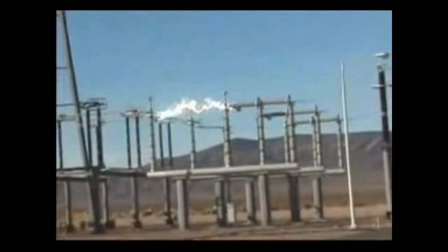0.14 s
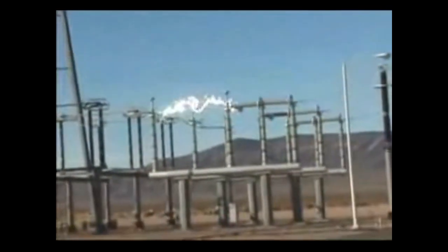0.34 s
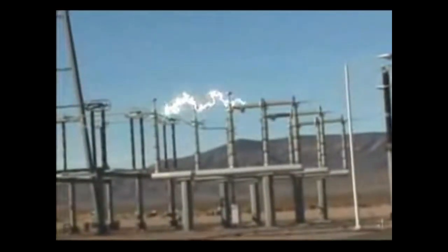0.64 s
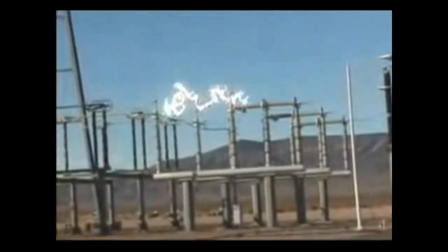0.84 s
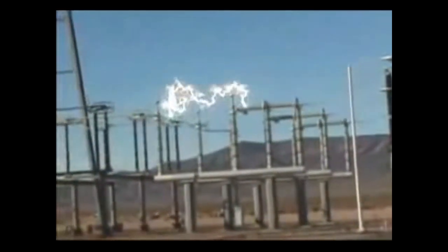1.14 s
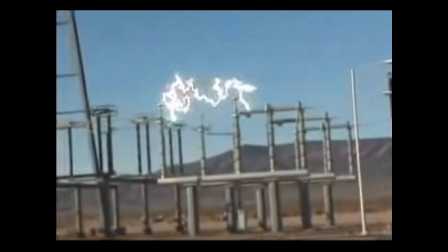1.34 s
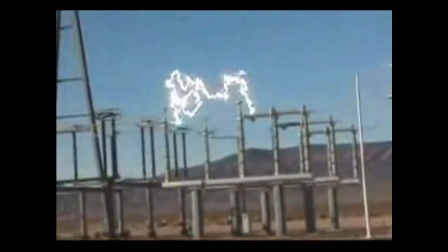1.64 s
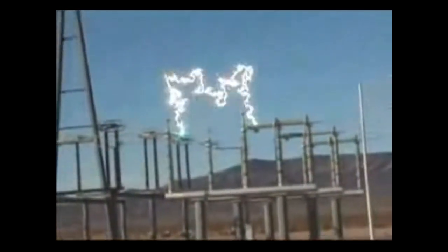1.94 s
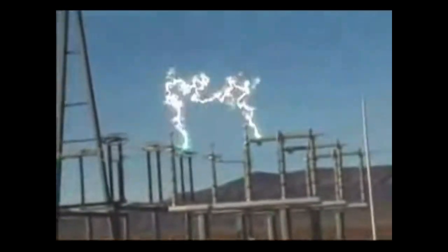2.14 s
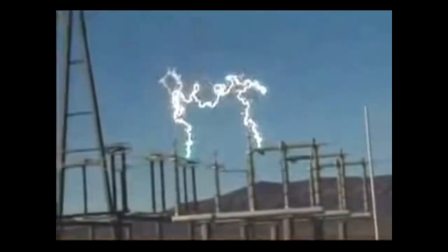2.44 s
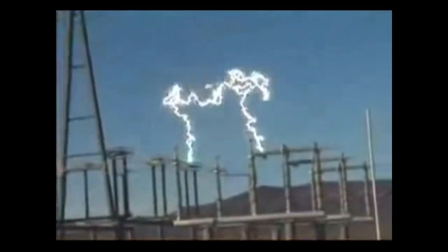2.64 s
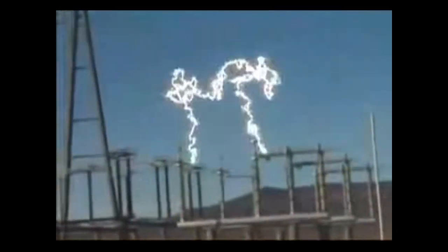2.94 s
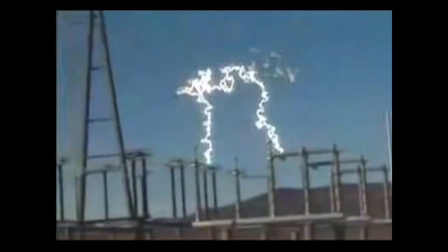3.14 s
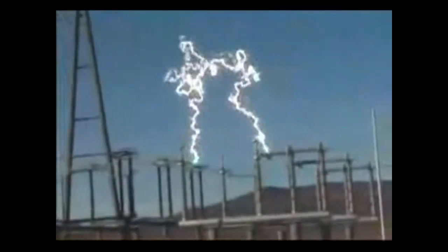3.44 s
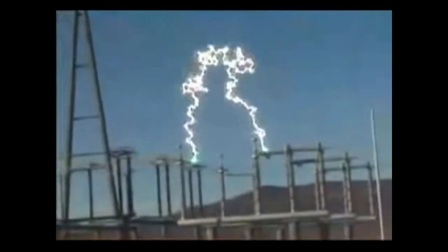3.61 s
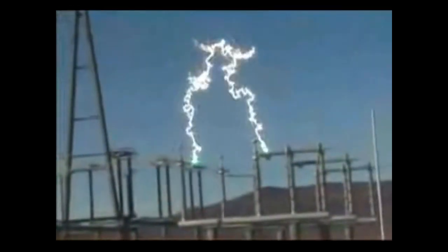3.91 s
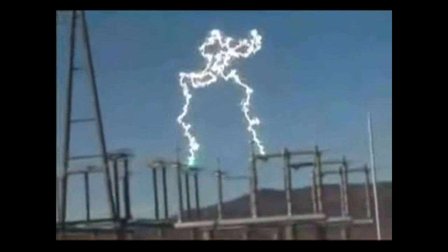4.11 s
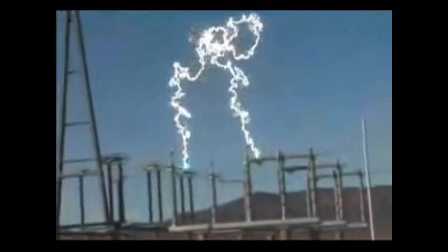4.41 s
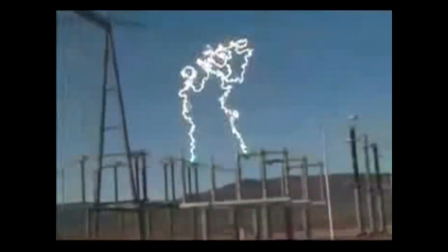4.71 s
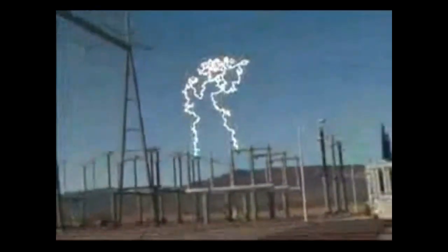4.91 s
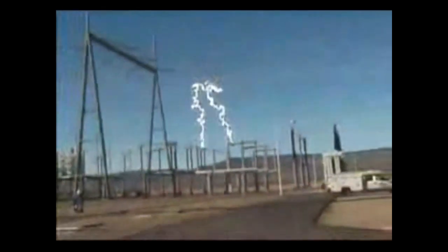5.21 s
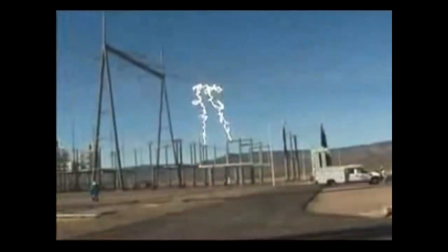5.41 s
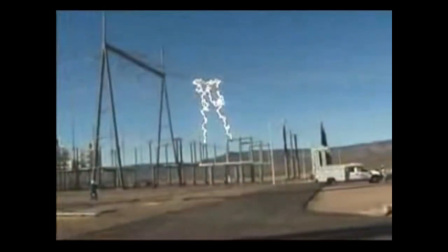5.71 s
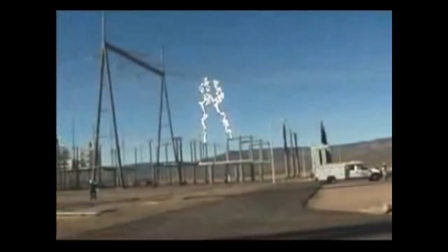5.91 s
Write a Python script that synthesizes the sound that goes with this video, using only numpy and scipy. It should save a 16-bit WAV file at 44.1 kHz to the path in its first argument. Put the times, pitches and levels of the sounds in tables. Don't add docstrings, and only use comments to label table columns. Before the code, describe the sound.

A long high-voltage arc burns over an open switch in an outdoor yard, heard from a distance on a small camera. A deep hum near 120 hertz drones unbroken, wavering in tone, while dense sputtering hiss swells and ragged crackles snap. A hard knock with a deep push lands just past two seconds; the hum weakens at the end while the hiss continues.

```python
import sys
import numpy as np
from scipy import signal
from scipy.fft import rfft, irfft
from scipy.io import wavfile

SR = 44100
rng = np.random.default_rng(int(sys.argv[2]) if len(sys.argv) > 2 else 0)


def makeup_ratio(level_db):
    decades = np.asarray(level_db, float) / 20
    return 10 ** decades


def persist_wave(psi):
    counts = np.round(np.clip(psi, -1, 1) * 32767).astype(np.int16)
    wavfile.write(sys.argv[1], SR, np.atleast_2d(counts).T)


N = 267246
PULSE_HZ = 119.76

# [t/s, level/dB]
HUM_LEVEL = [(0.0, -13.5), (0.47, -14.5), (0.49, -16), (0.7, -16), (0.73, -17), (1.11, -14), (1.24, -15.5),
             (1.41, -16.5), (2.53, -13), (3.69, -13), (3.73, -15), (4.08, -13), (5.0, -15), (5.52, -14.5),
             (5.55, -17.5), (5.79, -14.5), (5.94, -21), (6.06, -22)]
ORDER_LEVEL_DB = [0, -2.5, -8.5, -22.5, -24.5, -30.5]
# [t/s, depth/dB, length/s]
FIRST_ORDER_FADES = [(0.62, 3, .25), (0.9, 3.5, 0.54), (1.756, 2.5, 0.38), (2.174, 8.5, 0.2),
                     (2.288, 29, 0.022), (2.577, 11, 0.12), (2.796, 11, 0.42), (3.167, 4.5, 0.18),
                     (3.303, 10, 0.089), (3.457, 14.5, 0.16), (3.607, 12, 0.062), (3.789, 15, 0.33),
                     (4.115, 22.5, 0.1), (4.296, 9, 0.029), (4.491, 5, 0.21), (5.593, 14, 0.08),
                     (5.773, 7, 0.23), (5.874, 9, 0.077), (6.047, 19.5, 0.093)]
# [t/s, depth/dB, length/s]
SECOND_ORDER_FADES = [(0.103, 7.1, 0.26), (1.916, 17.6, 0.298), (2.262, 23.3, 0.017), (2.28, 10.6, 0.29),
                      (2.906, 7.3, 0.65), (3.275, 12.3, 0.25), (3.552, 15.5, 0.172), (3.777, 19, 0.053),
                      (3.903, 13.6, 0.35), (4.314, 17, 0.21), (4.8, 10, 0.13), (4.976, 9.2, 1.0),
                      (5.618, 10.8, 0.35), (5.948, 6.9, 0.032)]
# [t/s, depth/dB, length/s]
THIRD_ORDER_FADES = [(0.036, 7.9, 1.0), (0.782, 16.3, 0.077), (1.343, 8.8, 0.61), (2.091, 20, 0.36),
                     (3.074, 12.3, 1), (3.91, 19, 0.087), (4.104, 18, 0.2), (4.508, 8.2, 0.16),
                     (4.878, 29, 0.21), (5.085, 18.2, 0.063), (5.392, 7, 0.396), (5.676, 10, 0.078)]
# [t/s, depth/dB, length/s]
UPPER_ORDER_FADES = [(0.1, 17, 0.57), (.65, 9, 0.48), (1.3, 8, 1), (2.05, 6, 0.65), (2.45, 12, 0.26),
                     (2.65, 5, 0.17), (3.1, 5, 0.22), (3.3, 5, 0.12), (3.47, 9, 0.093), (4.07, 17, 0.1),
                     (4.45, 9, 0.1), (5.03, 9, 0.069), (5.3, 5.5, 0.34), (6.0, -6, 0.15)]
# [t/s, hiss level/dB, brightness/dB]
VIGOUR = [(0.0, -30, 4), (0.25, -30, -0.8), (0.4, -31.5, 1.7), (1.32, -29, -1.8), (1.74, -27, 2.4),
          (2.16, -26, -1.8), (2.28, -26, 0.5), (3.83, -24.5, 1.3), (3.95, -24.5, -0.5), (5.42, -25, -1),
          (6.06, -25, 0)]
# [t/s, depth/dB, length/s]
PAUSES = [(.27, 2, 0.067), (.56, 1.5, 0.15), (.77, 1, 0.11), (1.08, 2, 0.038), (1.57, 2.5, 0.066),
          (1.72, 1.5, 0.13), (1.79, 2.5, 0.054), (2.04, 0.5, 0.086), (2.39, 2.5, .08), (2.56, 1, 0.039),
          (2.64, 0.5, 0.06), (2.902, 3.5, 0.028), (2.95, 1, 0.035), (3.07, 1.5, 0.25), (3.31, 2, 0.059),
          (3.7, 1, 0.36), (4.02, 0.5, 0.084), (4.33, 1, 0.11), (4.8, 0.5, 0.22), (5.33, 1.5, 0.06),
          (5.6, 1, 0.15)]
# [t/s, crown echo lag/ms, echo share/0-1, tangle/0-1]
ARC_SHAPE = [(0, 1.027, 0.38, 0.39), (1.2, 1, 0.24, 0), (1.8, 1.32, 0.23, 0.39), (2.3, 1.365, 0.27, 1),
             (3.0, 1.695, 0.35, 0.9), (3.8, 1.738, 0.46, 1), (4.6, 1.934, 0.32, 0.43), (5.4, 2, 0.33, 1),
             (6.06, 1.8, 0.22, 1)]
# [f/Hz, density/dB per Hz]
PLASMA_SPECTRUM = [(25, -19), (85, -3), (150, 4.5), (300, 7.5), (430, 0), (570, -5.5), (760, 1),
                   (1100, -3.5), (2000, -8.5), (3000, -11.5), (5000, -18.5), (7000, -26.5), (9000, -36),
                   (10000, -42)]
# [t/s, top level/dB, middle over top/dB, length/ms]
BRIGHT_RESTRIKES = [(0.3949, -19, -3, 8.3), (0.4768, -20.5, 1.5, 6.3), (0.9617, -20.5, -2, 7.8),
                    (0.9996, -12, -10, 4), (1.5015, -17, -2, 5.0), (1.6237, -19, -1, 4.5),
                    (1.6591, -16, 0, 7.2), (1.823, -20, -1, 7.1), (1.924, -15.5, 1.5, 7.2),
                    (1.9709, -13.5, 0, 4.1), (2.163, -14.5, -2, 5.0), (2.2653, -17.5, 2.5, 9.9),
                    (2.3426, -13.5, -6, 5.0), (2.795, -16, 0, 3.3), (2.8687, -15.5, -1, 9.1),
                    (2.878, -15.5, 4, 7.2), (2.9218, -14, 1, 8.7), (2.9968, -13, 2.5, 4.5),
                    (3.4134, -13.5, 3.5, 4.1), (3.5513, -12, 3, 4.3), (3.6238, -7.5, -4, 12.5),
                    (3.8503, -12, 2, 4.7), (3.8978, -19, -5, 5.0), (3.9494, -16.5, -2, 13),
                    (4.283, -15, 3.5, 8.6), (4.6014, -24, 1, 4.4), (5.0523, -13.5, -5, 4),
                    (5.8103, -13, -4, 5.0), (5.8808, -16.5, -1, 9.2), (5.9516, -12.5, -3, 5.0)]
# [t/s, middle level/dB, length/ms]
DULL_RESTRIKES = [(0.055, -9.5, 1.4), (0.157, -14.5, 4.8), (0.204, -17, 2.5), (0.315, -14, 1.7),
                  (0.381, -14, 1.2), (0.431, -14.5, 2.3), (0.596, -17, 3.0), (0.674, -16, 2.5),
                  (0.712, -15.5, 3.0), (0.731, -24, 6.1), (0.842, -21, 3.0), (0.941, -15, 5.1),
                  (1.039, -21, 8.4), (1.255, -18.5, 3.7), (1.351, -17, 2.1), (1.761, -13.5, 6),
                  (2.18, -21.5, 4.4), (2.19, -10.5, 4.6), (2.304, -11.5, 1.5), (2.571, -18, 1.7),
                  (2.695, -7, 2.1), (2.745, -11.5, 4.7), (2.76, -13, 3.0), (3.276, -13, 3.0),
                  (3.756, -15, 1.8), (4.204, -15, 2.3), (4.377, -13, 4.2), (4.925, -9.5, 1.2),
                  (5.546, -9, 3.7), (5.699, -10.5, 3.0)]
# [t/s, peak level/dB, push f/Hz]
LOOP_COLLAPSES = [
    (2.281, -18, 45),
    (2.2735, -10, 520),
    (2.277, -13, 280),
    (5.558, -22, 70),
    (0.01, -33, 40),
]


def hum(cycle, tangle):
    hum_db, = in_time(HUM_LEVEL)
    tangle_lift_db, upper_waver_db = 2.5, 4
    shifts_db = [-fade(FIRST_ORDER_FADES), -fade(SECOND_ORDER_FADES), -fade(THIRD_ORDER_FADES)]
    for _ in range(3):
        shifts_db.append(tangle_lift_db * tangle - fade(UPPER_ORDER_FADES) + upper_waver_db * drift(6.3))
    out = np.zeros(N)
    for k, (order_db, shift_db) in enumerate(zip(ORDER_LEVEL_DB, shifts_db)):
        wander_rad = tangle * (1.5 * drift(1.2) + 0.25 * drift(12))
        flutter_db = 1.2 * drift(17)
        phase_rad = (k + 1) * cycle + 1.16 * k + wander_rad - wander_rad[0]
        out += np.sqrt(2) * makeup_ratio(hum_db + order_db + shift_db + flutter_db) * np.cos(phase_rad)
    return out


def hiss(envelope, lag_ms, share):
    mean_hiss_db = -27
    roar_per_fade = 0.26
    hiss_db, bright_db = np.array(in_time(VIGOUR)) - fade(PAUSES) * [[1], [0.6]]
    noise = colour(ground_echo(envelope * shocks(N, spread_db=2.5), lag_ms, share))
    range_db = [-15.5, -10.5, -12, -13]
    follows = [0.54, 1.08, 1.7, 1.58]
    tilts = [-0.3, -0.3, 0.67, 0.9]
    gains_db = [db + follow * (hiss_db - mean_hiss_db) + tilt * bright_db
                for db, follow, tilt in zip(range_db, follows, tilts)]
    gains_db[0] += roar_per_fade * fade(FIRST_ORDER_FADES)
    parts = ranges(noise, [200, 850, 2400, 6000])
    return sum(makeup_ratio(db + 1.1 * drift(33)) * part for db, part in zip(gains_db, parts))


def sputter(cycle, lag_ms):
    pulsing = np.clip(0.95 - 0.6 * lag_ms, 0.05, 0.3)
    current = 1 + pulsing * np.cos(cycle - 0.6)
    rate_hz = 350 * current * makeup_ratio(1.5 * drift(14))
    born = rng.random(N) < rate_hz / SR
    sizes = makeup_ratio(2.6 * np.minimum(rng.exponential(1, N), 2.2))
    age_ms = np.arange(round(0.015 * SR)) * 1000 / SR
    burst = np.minimum(age_ms / 0.1, 1) * np.exp(-age_ms / 1.75)
    bursts = signal.fftconvolve(born * sizes, burst)[:N]
    return rms_one(current * (2.6 + bursts))


def restrikes(lag_ms, share):
    s, middle_db, top_db, length_ms = np.transpose(volleys(count=70))[..., None]
    half = 512
    age_ms = np.arange(-half, half) * 1000 / SR - 0.5
    spread_ms = np.where(age_ms < 0, 0.5, 0.68 * np.maximum(length_ms, 1))
    shape = np.exp(-np.abs(age_ms / spread_ms) ** 2.5)
    noise = colour(shape * shocks(shape.shape, spread_db=0.5))
    _, *bands = ranges(noise, [220, 700, 1900, 3400])
    energy = np.linalg.norm(shape, axis=1, keepdims=True)
    low, middle, high = (v * energy / np.linalg.norm(v, axis=1, keepdims=True) for v in bands)
    body = makeup_ratio(middle_db - 5.5) * low + makeup_ratio(middle_db - 10) * middle
    edge = makeup_ratio(top_db - 5) * high
    out = np.zeros(N + 2 * half)
    np.add.at(out, np.round(s * SR).astype(int) + np.arange(2 * half), body + edge)
    return ground_echo(out[half:half + N], lag_ms, share)


def volleys(count):
    peak_middle_db, peak_top_db = 1.5, -6
    thud_top_db = -14
    minor_db, minor_top_db, minor_spread_db = 9, -7.5, 4
    rows = [(s, db + rel_db + peak_middle_db, db + peak_top_db, ms) for s, db, rel_db, ms in BRIGHT_RESTRIKES]
    rows += [(s, db + peak_middle_db, db + thud_top_db, ms) for s, db, ms in DULL_RESTRIKES]
    for k, (late, a, b, c) in enumerate(rng.uniform(-1.1, 1, (count, 4))):
        s = (k + 0.5 + 0.5 * late) * (N - 1) / SR / count
        hiss_db = np.interp(s, *np.transpose(VIGOUR)[:2])
        middle_db = hiss_db + minor_db + minor_spread_db * a
        top_db = hiss_db + minor_top_db + 2 * minor_spread_db * b
        rows.append((s, middle_db, top_db, 2.95 + 2 * c))
    return rows


def collapses():
    t, out = np.arange(N) / SR, np.zeros(N)
    for s, db, hz in LOOP_COLLAPSES:
        turn = np.pi * hz * (t - s)
        out += makeup_ratio(db) * 3.2 * turn * np.exp(-turn ** 2)
    return out


def ground_echo(x, lag_ms, share):
    feet_lag_ms, feet_share = 1.095, 0.085
    n = np.arange(N)
    dull = signal.sosfiltfilt(signal.butter(1, 4500, fs=SR, output="sos"), x)
    feet = feet_share * np.interp(n - feet_lag_ms * SR / 1000, n, dull)
    crown = np.clip(share, 0, 1) * np.interp(n - lag_ms * SR / 1000, n, dull)
    return x + feet + crown


def shocks(shape, spread_db):
    sizes = makeup_ratio(spread_db * np.minimum(rng.exponential(1, shape), 5))
    return rms_one(sizes * rng.standard_normal(shape))


def colour(x):
    size = x.shape[-1]
    hz = np.fft.rfftfreq(size, 1 / SR) + 1
    points_hz, points_db = np.transpose(PLASMA_SPECTRUM)
    gain_db = np.interp(np.log(hz), np.log(points_hz), points_db)
    return irfft(rfft(x) * makeup_ratio(gain_db), size)


def ranges(x, centres_hz):
    size = x.shape[-1]
    octaves = np.log2(np.fft.rfftfreq(size, 1 / SR) + 1)
    spectrum = rfft(x)
    return [irfft(spectrum * np.interp(octaves, np.log2(centres_hz), one), size)
            for one in np.eye(len(centres_hz))]


def fade(rows):
    t = np.arange(0, N, 64) / SR
    loss_db = sum(db * np.exp(-((t - s) / (0.5 * max(length_s, 0.015))) ** 2) for s, db, length_s in rows)
    return np.interp(np.arange(N) / SR, t, loss_db)


def drift(rate_hz):
    thin = 40
    r = np.exp(-2 * thin * np.pi * rate_hz / SR)
    noise = rng.standard_normal(N // thin + 2002)
    slow = signal.lfilter([1], [1, -2 * r, r * r], noise)[2000:]
    return np.interp(np.arange(N) / thin, np.arange(len(slow)), rms_one(slow))


def in_time(rows):
    s, *columns = np.transpose(rows)
    return [np.interp(np.arange(N) / SR, s, c) for c in columns]


def rms_one(x):
    return x / np.sqrt(np.mean(x ** 2) + 1e-20)


def scene():
    lag_ms, share, tangle = in_time(ARC_SHAPE)
    jitter_rad = tangle * (0.4 * drift(0.8) + 0.06 * drift(15))
    cycle = 2 * np.pi * PULSE_HZ * np.arange(N) / SR + jitter_rad
    arc = hum(cycle, tangle)
    arc += hiss(sputter(cycle, lag_ms), lag_ms, share)
    arc += restrikes(lag_ms, share)
    return (arc + collapses())[None]


def low_pass(x):
    return signal.sosfilt(signal.butter(12, 12700, fs=SR, output="sos"), x)


def record(dry):
    x = 0.73 * np.tanh(dry / 0.77) - 0.0026
    x = signal.sosfilt(signal.ellip(10, 0.5, 60, 9930, fs=SR, output="sos"), x)
    n = np.arange(N)
    mirror = signal.sosfilt(signal.ellip(10, 1, 90, 12400, fs=SR, output="sos"), x * (-1) ** n)
    bass = signal.sosfilt(signal.butter(4, 400, fs=SR, output="sos"), x)
    whistle = makeup_ratio(-89) * (1 + 3.5 * bass) * np.cos(np.pi / 2 * n)
    return low_pass(x + makeup_ratio(-11.5) * mirror + whistle)


dry = scene()
out = record(dry)
persist_wave(out)
```